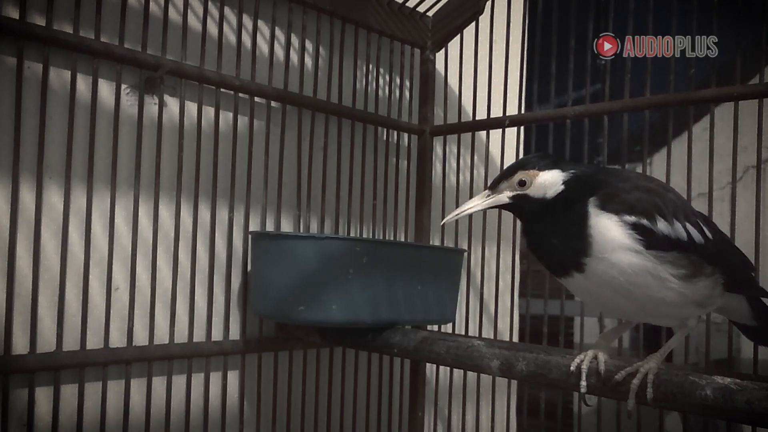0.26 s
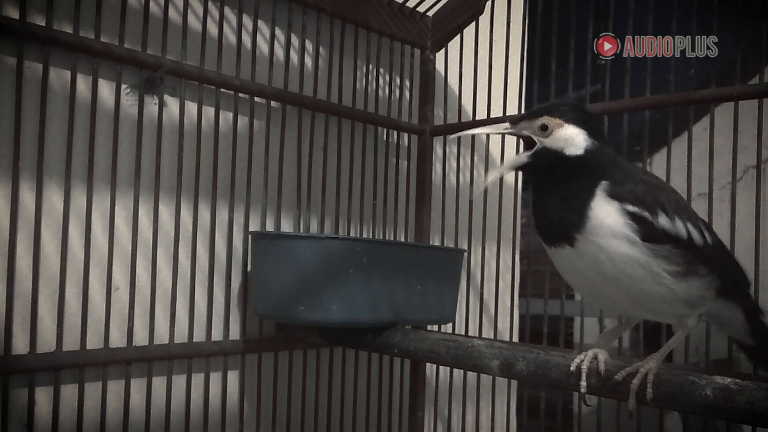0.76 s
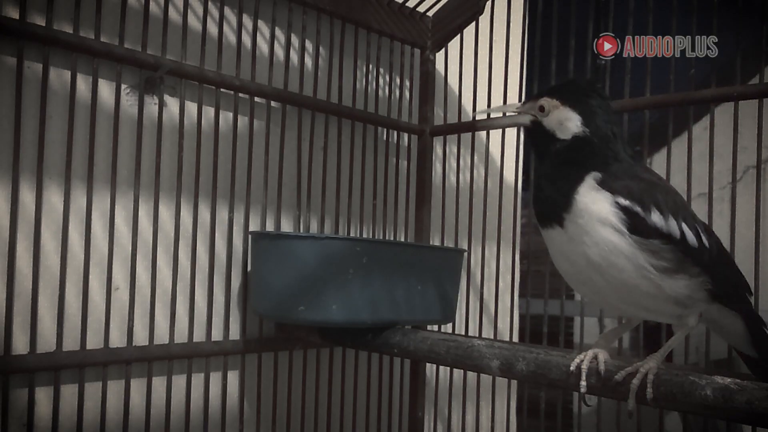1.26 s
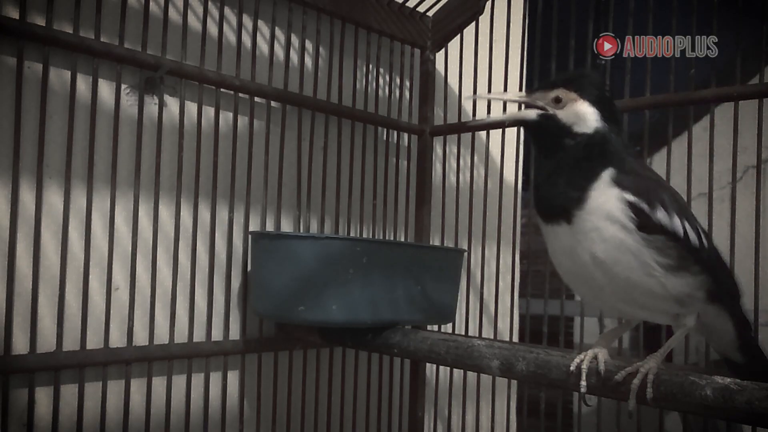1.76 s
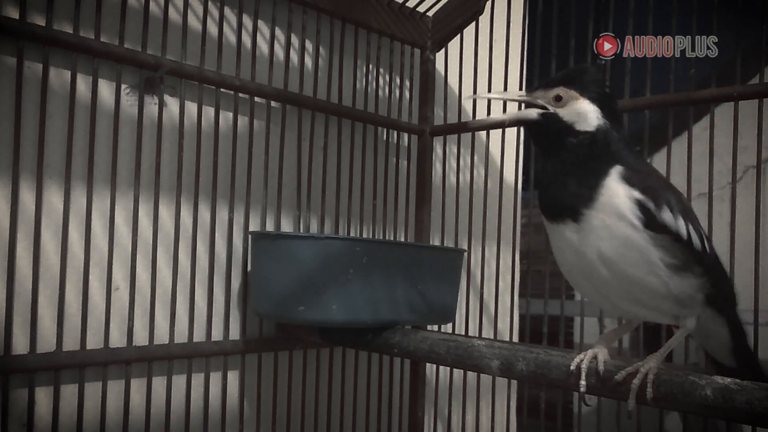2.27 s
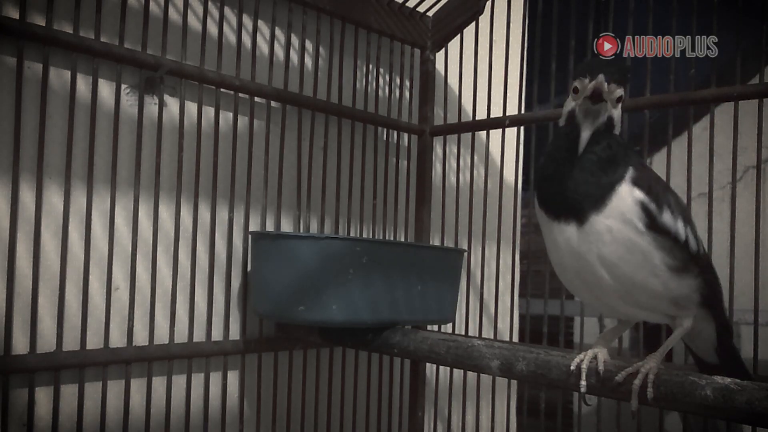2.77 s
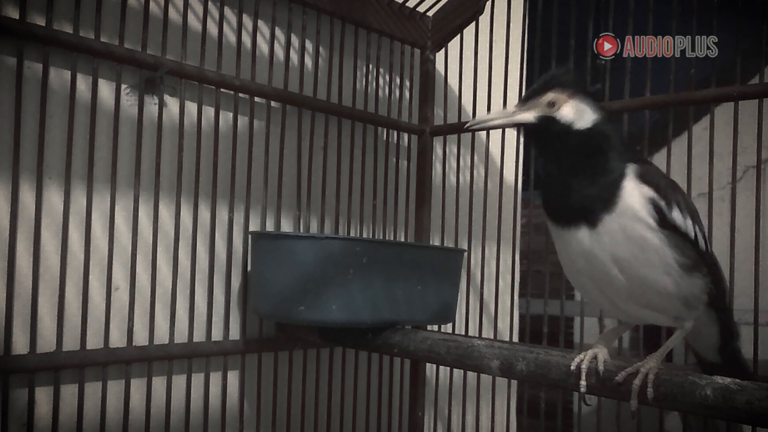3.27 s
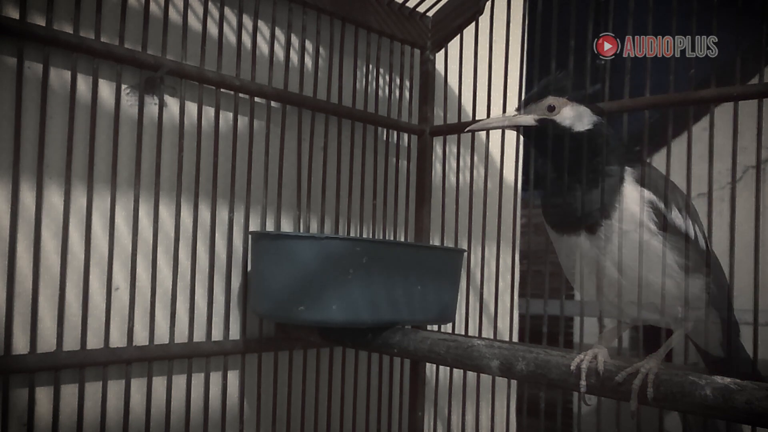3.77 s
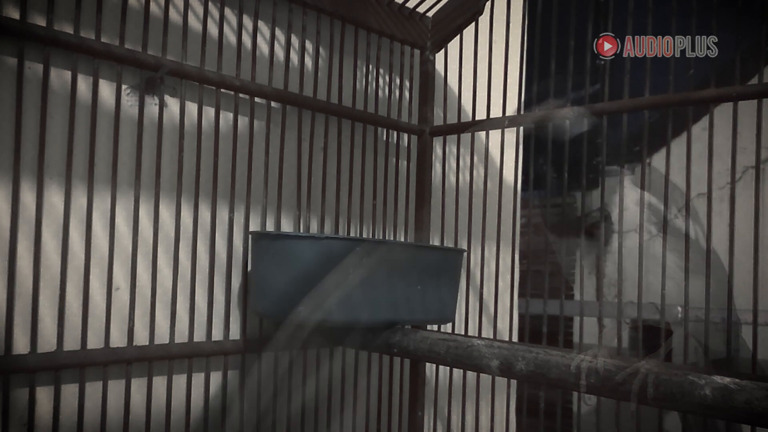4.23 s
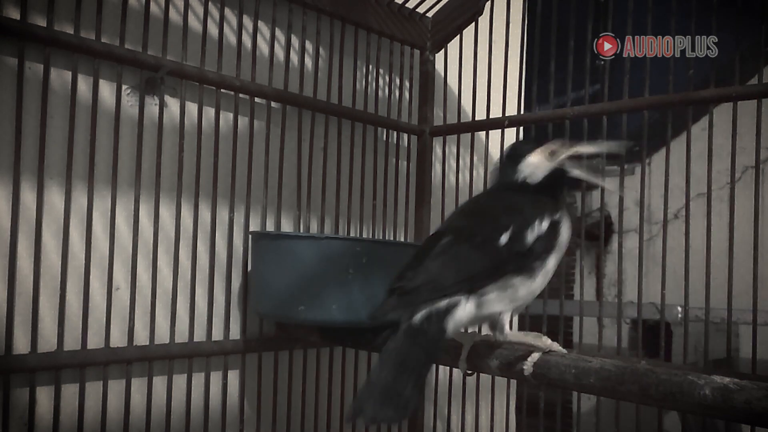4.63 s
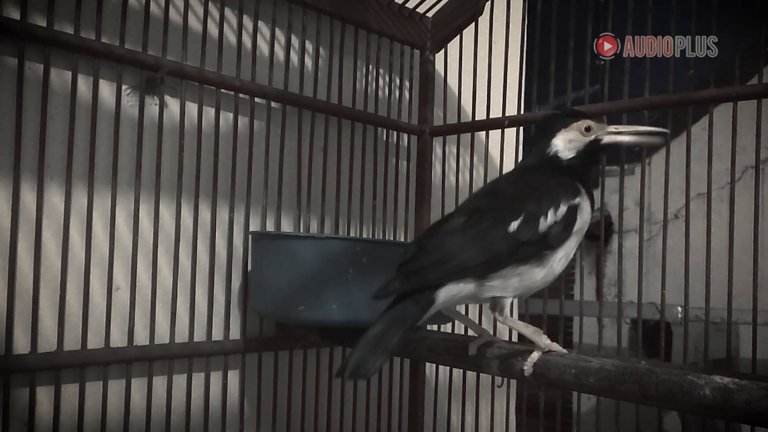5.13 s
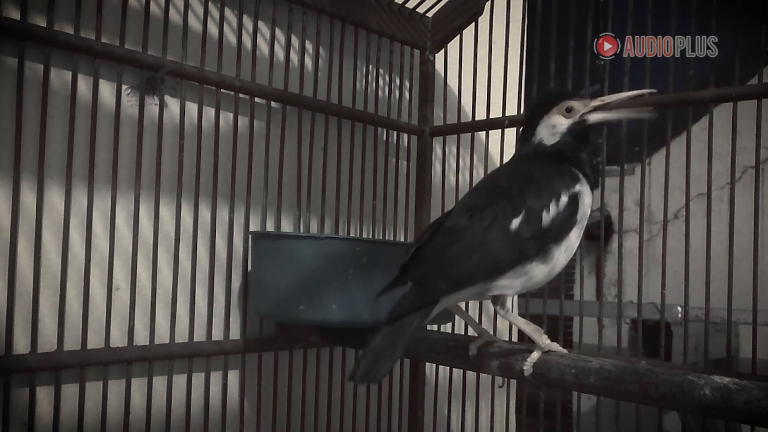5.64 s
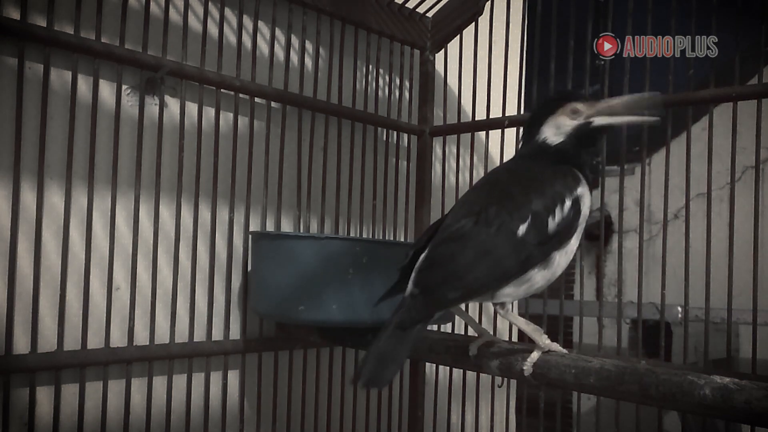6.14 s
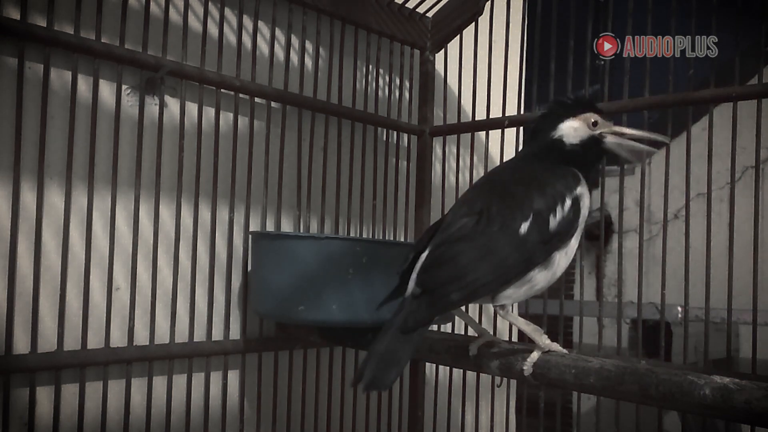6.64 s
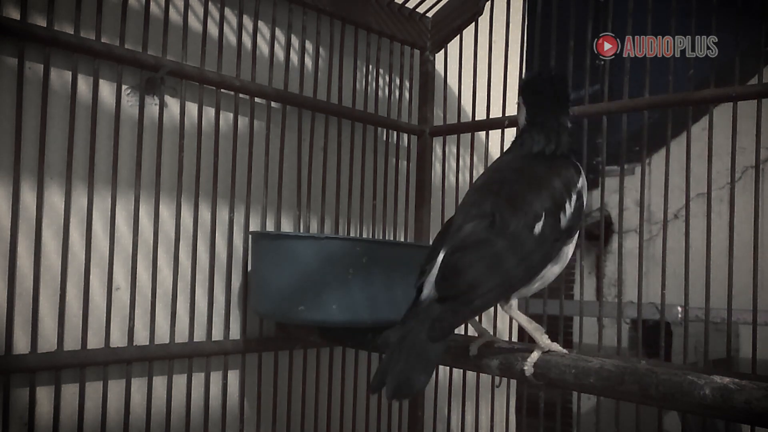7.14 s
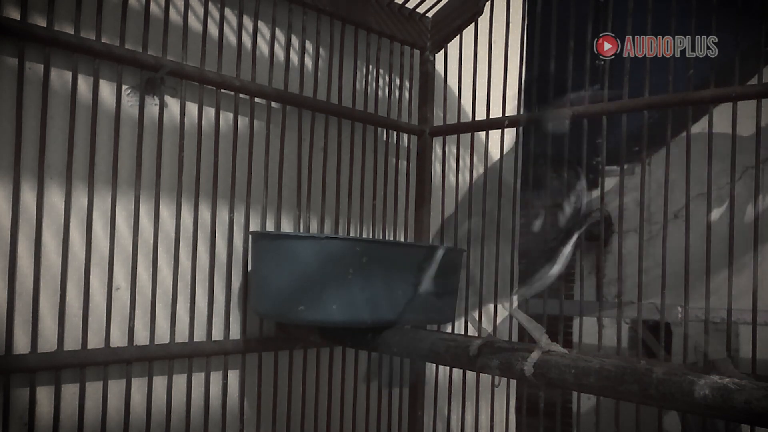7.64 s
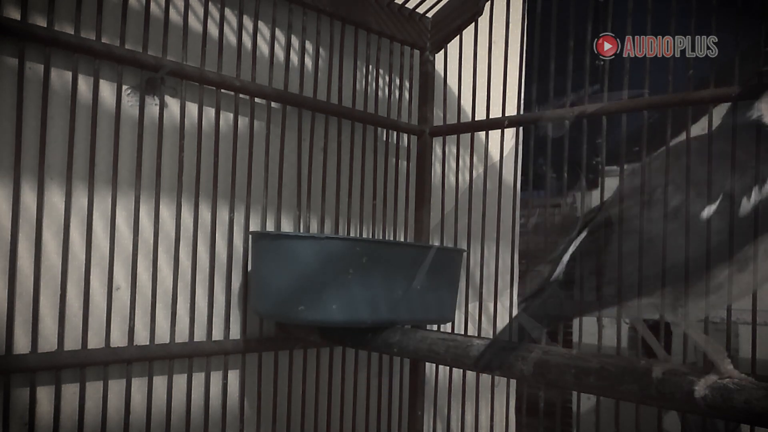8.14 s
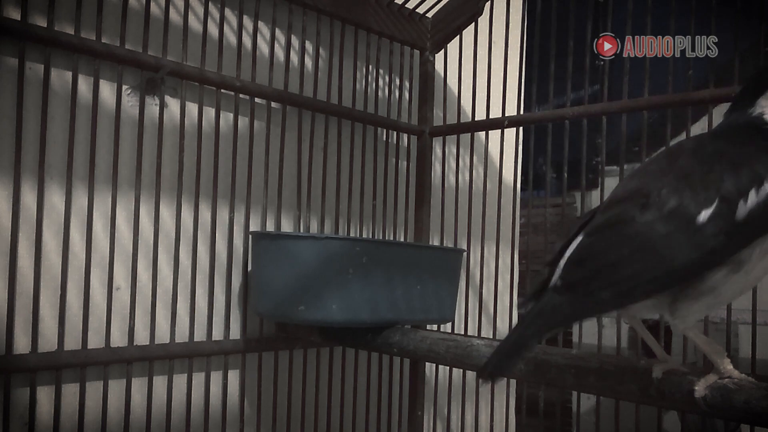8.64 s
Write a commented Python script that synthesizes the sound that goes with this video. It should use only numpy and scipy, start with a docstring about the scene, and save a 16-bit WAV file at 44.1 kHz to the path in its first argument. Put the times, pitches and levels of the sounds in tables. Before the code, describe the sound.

A single starling sings close by in a hard, echoing room. A tiny peep, sharp falling slide and low warble open each phrase, then rapid rounds of shrill call, short trill and longer trill repeat. Two long phrases are separated by a short break with small dry ticks; a third begins near the end. Traffic hums very faintly behind.

```python
"""A pied starling sings three phrases in a cage that stands in a hard-walled, echoing room.
Each phrase opens with a peep, a falling slide and a low warble, then gives shrill call, short trill, long trill:
four rounds, four rounds with a closing call and whistle, then one round.
Notes are gliding harmonic tones with a set tone colour; all but the peeps have quick upward flicks of pitch.
Traffic hums far away; the dying echo of an earlier whistle, low hollow tones and small dry ticks are heard too."""
import sys
import numpy as np
from scipy import signal
from scipy.fft import rfft, irfft, next_fast_len
from scipy.io import wavfile
from scipy.ndimage import uniform_filter1d, minimum_filter1d, map_coordinates

SR = 44100
rng = np.random.default_rng(int(sys.argv[2]) if len(sys.argv) > 2 else 0)


def materialize(psi):
    """Save the field psi as 16-bit PCM at rate SR to the path in sys.argv[1].

    A 1-D psi becomes a single channel; in a 2-D psi each row is a channel.
    """
    bounded = np.clip(np.atleast_2d(psi).T, -1, 1)
    quanta = np.round(bounded * 32767).astype(np.int16)
    wavfile.write(sys.argv[1], SR, quanta)


N = 392490
TOP_HZ = 14650  # band limit


def amp(db):
    """Decibels to amplitude factor."""
    return 10 ** (np.asarray(db) / 20)


def unit(x):
    """x at rms 1."""
    return x / np.sqrt(np.mean(x ** 2) + 1e-20)


def along(points, hz):
    """(Hz, value) points read on a log frequency axis."""
    point_hz, value = np.transpose(points)
    return np.interp(np.log(hz + 1), np.log(point_hz + 1), value)


def at_time(points, s):
    """(s, value) points read on a linear time axis."""
    return np.interp(s, *np.transpose(points))


def wobble(knots_per_s, size):
    """A smooth random curve through normally distributed knots."""
    knots = rng.standard_normal(size // 8 + 4)
    return map_coordinates(knots, [np.arange(size) * knots_per_s / SR], mode="mirror")


def filtered(x, response):
    """x times a response of frequency."""
    size = x.shape[-1]
    padded = next_fast_len(size + SR // 8)
    spectrum = rfft(x, padded) * response(np.fft.rfftfreq(padded, 1 / SR))
    return irfft(spectrum, padded)[..., :size]


def add(track, s, sound):
    """Mix a stereo sound into the track at time s."""
    part = track[:, round(s * SR):][:, :sound.shape[1]]
    part += sound[:, :part.shape[1]]


def ramp(t, span_s):
    """From 0 to 1 within span_s."""
    return np.clip(t / span_s, 0, 1)


def arch(t, attack_s, release_s):
    """Attack, hold at 1, release to 0 at the end of t."""
    return np.minimum(ramp(t, attack_s), ramp(t[-1] - t, release_s))


# Traffic spectrum: (frequency [Hz], relative density [dB])
TRAFFIC_SPECTRUM = [(25, -34), (50, -23.5), (90, -12.5), (160, -1.5), (280, -11.5), (500, -6), (720, -9),
                    (1100, -24.5), (2400, -28.5), (5000, -54)]
# Traffic loudness: (time [s], level [dB])
TRAFFIC_LEVEL = [(0, -64.5), (.8, -52.5), (3.8, -57), (5.5, -52.5), (7.401, -58), (8.9, -51.5)]


def traffic(side_db=-6, hiss_db=-86):
    """Low street hum, nearly mono: shaped noise with a weaker side signal, over a faint white hiss."""
    hum = filtered(rng.standard_normal((2, N)), lambda hz: amp(along(TRAFFIC_SPECTRUM, hz)))
    mid, side = hum * amp([[0], [side_db]])
    stereo = unit(np.array([mid + side, mid - side]))
    level_db = at_time(TRAFFIC_LEVEL, np.arange(N) / SR)
    return amp(level_db) * stereo + amp(hiss_db) * rng.standard_normal((2, N))


# Room decay: (frequency [Hz], time to fall 60 dB [s])
ROOM_T60 = [(1000, 0.65), (2700, .78), (5000, 0.87), (8000, 0.61), (14000, 0.54)]
# Treble is beamed forward and feeds the room less: (frequency [Hz], gain [dB])
ROOM_COLOUR = [(1300, -1), (3500, -2), (7000, -1.5), (14000, -3.5)]
# Perch position: (time [s], lead of the left port [ms])
PERCH_LEAD = [(0, .05), (4, .06), (4.5, .09), (7.4, .09), (7.8, .2)]


def paths(s, direct_db, cage_db=-7, cage_life_s=0.0023, wall_db=-7, wall_life_s=0.042,
          room_db=-3.5, gap_s=0.0049):
    """Impulse responses to both ports: direct sound, cage scatter, sparse near-wall echoes, diffuse tail."""
    size = SR * 3 // 4
    t = np.arange(size) / SR
    # each band of the tail decays at its own rate
    hz, frame_s, noise = signal.stft(rng.standard_normal((2, size)), SR, nperseg=256)
    decay = amp(-60 * frame_s / along(ROOM_T60, hz)[:, None])
    tail = signal.istft(noise * decay, SR, nperseg=256)[1][:, :size] * (t > gap_s)
    cage = rng.standard_normal((2, size)) ** 3 * t * np.exp(-2 * t / cage_life_s)
    # the fifth power makes the noise sparse
    walls = rng.standard_normal((2, size)) ** 5 * (t > gap_s) * np.exp(-t / wall_life_s)
    room = amp(wall_db) * unit(walls) + amp(room_db) * unit(tail)
    room = filtered(room, lambda hz: amp(along(ROOM_COLOUR, hz)))
    echoes = (amp(cage_db) * unit(cage) + room) / np.sqrt(size)
    lead = round(at_time(PERCH_LEAD, s) * SR / 1000)
    direct = np.array([t == 0, np.arange(size) == lead])
    return echoes + amp(direct_db) * direct


# Faint tones: first the dying echo of a whistle sung just before, then low hollow tones from far off:
# (time [s], length [s], first pitch [Hz], last pitch [Hz], level before the room [dB])
FAINT_TONES = [(0, .14, 2673, 2447, -61), (0.604, 0.16, 590, 607.5, -49.5), (1.417, 0.48, 590, 508, -55),
               (3.56, 0.52, 700, 596, -58)]


def faint_tones(waver_hz=24):
    """Soft wavering sine glides, arriving mostly as echo."""
    track = np.zeros((2, N))
    for s, length_s, first_hz, last_hz, level_db in FAINT_TONES:
        size = round(length_s * SR)
        pitch_hz = np.linspace(first_hz, last_hz, size) + waver_hz * wobble(58, SR)[:size]
        tone = np.sin(2 * np.pi * np.cumsum(pitch_hz) / SR) * signal.windows.tukey(size)
        heard = signal.fftconvolve(tone[None], paths(s, direct_db=-4), axes=1)
        add(track, s, amp(level_db) * heard)
    return track


def flick_train(first_s, gap_s, top_hz, count, quicken=1, tire_hz=0):
    """(s, top Hz) of each flick: each gap is quicken times the last; tops sag by up to tire_hz."""
    k = np.arange(count)
    gaps_s = gap_s * quicken ** k
    times_s = first_s + np.cumsum(gaps_s) - gaps_s
    return list(zip(times_s, top_hz - tire_hz * (k / max(count - 1, 1)) ** 2))


def syrinx(length_s, gesture, flicks, colour, overtone_db, rise_s, fall_s, accent_db, bright_db, jitter,
           rasp_db, lag_s, attack_s=0.003, release_s=0.003, uneven_db=1.5, uneven_top=0.04053, detune=0.0073):
    """One note: a harmonic tone follows the gesture, flicks upward and sweeps through its tone colour."""
    size = round(length_s * SR) + 1
    t = np.arange(size) / SR
    pitch_hz, level_db = gesture(t)
    push = np.zeros(size)

    def snap(s):
        """Muscles snap tight and relax again."""
        return 1 / np.cosh(np.clip((t - s) / np.where(t < s, rise_s, fall_s), -20, 20))

    for s, top_hz in flicks:
        flick_hz = top_hz * (1 + uneven_top * rng.standard_normal())
        pitch_hz = pitch_hz + (flick_hz - pitch_hz) * snap(s)
        # air flow changes with each flick, lag_s behind the pitch
        air = snap(s + lag_s)
        push += air
        level_db = level_db + (accent_db + uneven_db * rng.standard_normal()) * air
    pitch_hz = pitch_hz * (1 + detune * rng.standard_normal() + jitter * wobble(700, SR // 2)[:size])
    phase = 2 * np.pi * np.cumsum(pitch_hz) / SR
    buzz_db = overtone_db + bright_db * push  # harder pushes brighten the tone
    k = np.arange(1, 13)[:, None]  # harmonic number
    partial_hz = k * pitch_hz
    gains = amp(along(colour, partial_hz) + buzz_db * (k > 1)) * (partial_hz < SR / 2)
    tone = np.sum(gains * np.sin(k * phase), axis=0)
    # membrane rasp between the harmonics
    floor_hz = np.median(pitch_hz)
    rasp = filtered(rng.standard_normal(SR // 2),
                    lambda hz: amp(along(colour, hz)) * (hz > floor_hz) * (hz < TOP_HZ))
    voice = tone + amp(rasp_db + buzz_db) * unit(rasp)[:size]
    return arch(t, attack_s, release_s) * amp(level_db) * voice


def burst(size, life_s, corner_hz):
    """Click that opens a note: decaying high-passed noise."""
    hiss = filtered(rng.standard_normal(SR // 2),
                    lambda hz: hz ** 2 / (hz ** 2 + corner_hz ** 2) * (hz < TOP_HZ))
    return unit(hiss)[:size] * np.exp(-np.arange(size) / SR / life_s)


def bars(x, reflect=0.98, reach_s=0.0027, corner_hz=4500, count=4):
    """Thin cage bars beside the bill reflect mainly treble and comb it into ridges."""
    delays_s = reach_s * rng.uniform(.25, 1, (count, 1))

    def comb(hz):
        """Direct sound plus delayed reflections."""
        share = reflect * hz ** 2 / (hz ** 2 + corner_hz ** 2)
        echoes = np.exp(-2j * np.pi * hz * delays_s).sum(axis=0)
        return (1 + share * echoes) / np.sqrt(1 + count * share ** 2)

    return filtered(x, comb)


# How squarely the bill points at the microphone: (time [s], added to the direct sound [dB])
FACING = [(.5, -3), (3, -1), (4.4, -5.5), (5.5, -3.5), (6.8, -5.5), (8.6, -3)]


def notes(table, gesture, colour, flicks=(), direct_db=0, rise_s=0.0025, fall_s=0.0039, accent_db=0,
          bright_db=0, jitter=0.0057, rasp_db=-32, lag_s=0.00058, pop_db=-60, pop_life_s=0.001, pop_hz=2500):
    """All notes of one kind; the head moves between them, so each meets new echoes."""
    track = np.zeros((2, N))
    for s, length_s, level_db, overtone_db, *fade in table:
        note = syrinx(length_s, lambda t: gesture(t, *fade), flicks, colour, overtone_db, rise_s, fall_s,
                      accent_db, bright_db, jitter, rasp_db, lag_s)
        size = len(note)
        note = bars(unit(note) + amp(pop_db) * burst(size, pop_life_s, pop_hz))
        room = paths(s, direct_db + at_time(FACING, s))
        heard = signal.fftconvolve(note[None], room, axes=1)
        add(track, s, amp(level_db) * heard / np.std(heard[:, :size]))
    return track


def peep(t, top_hz=2320, scoop_hz=500, scoop_s=0.0055, attack_s=0.0064, release_s=0.004, swell_db=18):
    """Scoops up to its pitch. Like every gesture it gives (pitch Hz, effort dB)."""
    return top_hz - scoop_hz * np.exp(-t / scoop_s), swell_db * arch(t, attack_s, release_s)


# Tone colour of peeps and slides: (frequency [Hz], gain [dB])
SLIDE_COLOUR = [(2000, -4.5), (3000, 2.5), (3900, -6), (4600, -9.5), (5300, -10), (7000, -4), (9000, -4.5),
                (12000, -12.5), (14500, -35.5)]
# (time [s], length [s], level [dB], overtones [dB])
PEEPS = [(.386, 0.024, -17, 7.5), (4.2, 0.0097, -31, -4), (7.887, 0.022, -24.5, 1)]


def peeps():
    """Tiny opening notes, with no flicks."""
    return notes(PEEPS, peep, SLIDE_COLOUR, direct_db=-2, rasp_db=-29.5)


def slide(t, start_hz=4000, overshoot_hz=950, settle_s=.005, fall_hz_per_s=35000, bottom_hz=2400,
          fade_db_per_s=340):
    """Starts overtight, then falls steadily to a floor and fades."""
    pitch_hz = start_hz + overshoot_hz * np.exp(-t / settle_s) - fall_hz_per_s * t
    return np.maximum(pitch_hz, bottom_hz), -fade_db_per_s * t


# (time [s], length [s], level [dB], overtones [dB])
SLIDES = [(.409, .058, -9, -3.5), (4.222, .06, -12, -7.5), (7.911, 0.06, -10, -8)]


def slides():
    """Falling notes that burst open with a click and flick once near the end."""
    flicks = flick_train(first_s=.051, gap_s=0, top_hz=2803, count=1)
    return notes(SLIDES, slide, SLIDE_COLOUR, flicks, direct_db=1.5, rise_s=.0025, fall_s=.012,
                 accent_db=12, jitter=0.01, rasp_db=-21.5, pop_db=-5.5)


def hook(t, pitch_hz, effort_db, hook_db, hook_s=.02, hook_hz=1090, break_s=0.0041, break_db=10):
    """Ends a gesture: the voice breaks for an instant and goes to a last low tone."""
    since_s = t - (t[-1] - hook_s)
    late = ramp(since_s, break_s)
    dip_db = break_db * np.exp(-(since_s / break_s) ** 2)
    return pitch_hz + (hook_hz - pitch_hz) * late, effort_db + (hook_db - effort_db) * late - dip_db


def warble(t, low_hz=1020, lift_hz=600, roundness=0.61, swell_db=12, span=1.06):
    """One round arch of effort, a little longer than the note, lifts pitch and level together."""
    effort = np.abs(np.sin(np.pi * t / (span * t[-1]))) ** roundness
    return hook(t, low_hz + lift_hz * effort, swell_db * effort, hook_db=5.5)


# Tone colour of warbles: (frequency [Hz], gain [dB])
WARBLE_COLOUR = [(1000, -13), (1400, -2), (1700, -1), (2300, -7), (3000, -9.5), (4500, -26), (7000, -33),
                 (11000, -29), (14500, -30.5)]
# (time [s], length [s], level [dB], overtones [dB])
WARBLES = [(.534, .168, -15.5, -7.5), (4.344, .172, -20, -5), (8.038, .178, -18, -3)]


def warbles():
    """Low notes with four even flicks that brighten the tone."""
    flicks = flick_train(first_s=.02, gap_s=.032, top_hz=2448, count=4)
    return notes(WARBLES, warble, WARBLE_COLOUR, flicks, direct_db=5.0, rise_s=.0022, fall_s=.0028,
                 accent_db=-1, bright_db=9, jitter=0.011, lag_s=0, rasp_db=-30.0)


def shrill(t, fade_db_per_s, hold_hz=3300, overshoot_hz=220, settle_s=.005, step_hz=260, step_at_s=.026,
           step_s=.011):
    """Held pitch that steps up a little at its second flick, and fades or swells."""
    settling_hz = overshoot_hz * np.exp(-t / settle_s)
    return hold_hz + settling_hz + step_hz * ramp(t - step_at_s, step_s), -fade_db_per_s * t


# Tone colour of shrill calls: (frequency [Hz], gain [dB])
CALL_COLOUR = [(3000, -1), (3500, 4.5), (4400, -4.5), (5500, -4), (6200, -19), (7100, -5), (8600, -11),
               (10000, -2.5), (11200, -7), (12300, -22), (13600, -15.5), (15000, -14.5)]
# (time [s], length [s], level [dB], overtones [dB], fade [dB/s, negative swells])
SHRILLS = [(.765, .066, -6, -6.5, 120), (1.365, .073, -6, -4.5, 128), (1.963, .074, -6.5, -6, 120),
           (2.591, 0.067, -5, -4, 9.5), (4.589, 0.08, -9.5, -9, 30), (5.219, .08, -9.5, -5.5, -28),
           (5.828, .068, -8, -6, 40), (6.446, 0.082, -10, -5, -20), (7.089, .1, -9.5, -7.5, 40),
           (8.276, 0.06, -6.5, -5.5, 60)]


def shrills():
    """Loud calls that burst open with a click; their flicks quicken and tire."""
    flicks = flick_train(first_s=.0005, gap_s=.0315, top_hz=5646, count=6, quicken=.78, tire_hz=920)
    return notes(SHRILLS, shrill, CALL_COLOUR, flicks, direct_db=1.5, rise_s=.0017, fall_s=.0018,
                 accent_db=1, bright_db=8, jitter=0.0032, rasp_db=-30, pop_db=-5.5)


def short_trill(t, low_hz=1000, lift_hz=290, attack_s=.018, swell_db=13, grow_db_per_s=50, leap_at_s=.08,
                leap_s=.01, leap_hz=560, climb_hz_per_s=12000, release_s=.012):
    """Scoops up to a low pitch, grows, and leaps into a rising whistle near its last flick."""
    after_s = np.maximum(t - leap_at_s, 0)
    pitch_hz = low_hz + lift_hz * ramp(t, attack_s)
    pitch_hz = pitch_hz + leap_hz * ramp(after_s, leap_s) + climb_hz_per_s * after_s
    return pitch_hz, swell_db * arch(t, attack_s, release_s) + grow_db_per_s * t


# Tone colour of trills and the whistle: (frequency [Hz], gain [dB])
LOW_COLOUR = [(1000, -8), (1350, -8), (1700, -1.5), (2150, 6.5), (2900, -0.5), (3800, -10), (4900, -17.5),
              (5700, -18), (8000, -16), (11000, -17.5), (14500, -25.5)]
# (time [s], length [s], level [dB], overtones [dB])
SHORT_TRILLS = [(.912, 0.12, -15, -3.5), (1.521, .11, -13, 4), (2.127, 0.13, -14.5, 3),
                (2.769, .11, -13, 1), (4.743, 0.1, -16, -3.5), (5.379, 0.11, -13.5, -2.5),
                (5.990, 0.115, -14.5, -0.5), (6.622, 0.11, -16.5, -4), (8.428, 0.11, -15, -2)]


def short_trills():
    """Low notes with three flicks, each accented a little after the pitch."""
    flicks = flick_train(first_s=.02, gap_s=.0337, top_hz=2817, count=3)
    return notes(SHORT_TRILLS, short_trill, LOW_COLOUR, flicks, direct_db=-0.5, rise_s=.0018, fall_s=0.0033,
                 accent_db=7.0, jitter=.008, rasp_db=-50.5, lag_s=0.005)


def long_trill(t, low_hz=1010, lift_hz=250, bow_hz=100, attack_s=.018, sag_s=.042, onset_db=13, swell_db=6.0):
    """Scoops up to a low pitch, swells and lifts towards the middle, and sags at the end."""
    bow = np.sin(np.pi * t / t[-1])
    pitch_hz = low_hz + lift_hz * arch(t, attack_s, sag_s) + bow_hz * bow
    return hook(t, pitch_hz, onset_db * ramp(t, attack_s) + swell_db * bow, hook_db=12.5)


# (time [s], length [s], level [dB], overtones [dB])
LONG_TRILLS = [(1.091, 0.2, -14, -2.5), (1.699, .2, -15, 0), (2.316, 0.2, -14.5, -1),
               (2.963, .2, -15, -3.5), (4.933, 0.22, -16, -3.5), (5.561, 0.19, -15, -2),
               (6.183, .186, -18, -4.5), (6.820, .19, -18, -6.5), (8.616, .2, -13.5, -2.5)]


def long_trills():
    """Low notes with five slightly quickening, tiring flicks."""
    flicks = flick_train(first_s=.0205, gap_s=.0355, top_hz=2951, count=5, quicken=0.96, tire_hz=118)
    return notes(LONG_TRILLS, long_trill, LOW_COLOUR, flicks, direct_db=2, rise_s=.0018, fall_s=.0033,
                 accent_db=5.5, bright_db=4.5, jitter=.009, rasp_db=-40.5, lag_s=.0035)


# Tick spectrum: (frequency [Hz], gain [dB])
TICK_COLOUR = [(2000, -16), (5000, -19), (9000, -1), (15000, -5.5)]
# Small dry ticks as the bird shifts: (time [s], relative level [dB])
TICKS = [(3.8435, -29), (3.9146, -18), (3.931, -15.5)]


def ticks(life_s=0.00084, gain_db=-14):
    """Bright, fast-decaying noise bursts that wake the room."""
    track = np.zeros((2, N))
    t = np.arange(SR // 16) / SR
    for s, level_db in TICKS:
        noise = filtered(rng.standard_normal(len(t)), lambda hz: amp(along(TICK_COLOUR, hz)))
        tick = unit(noise) * np.exp(-t / life_s)
        heard = signal.fftconvolve(tick[None], paths(s, direct_db=-13.5), axes=1)
        add(track, s, amp(level_db + gain_db) * heard)
    return track


def whistle(t, hold_hz=2590, attack_s=0.0021, swell_db=12, fade_db_per_s=100):
    """A level pitch that fades."""
    return np.full(len(t), hold_hz), swell_db * ramp(t, attack_s) - fade_db_per_s * t


# (time [s], length [s], level [dB], overtones [dB])
WHISTLES = [(7.202, .055, -14.5, -1.5)]


def whistles():
    """A steady note with one flick near its start."""
    flicks = flick_train(first_s=0.0065, gap_s=0, top_hz=2892, count=1)
    return notes(WHISTLES, whistle, LOW_COLOUR, flicks, direct_db=1, jitter=0.0015, rasp_db=-45)


def starling():
    """The song: every kind of note summed."""
    return peeps() + slides() + warbles() + shrills() + short_trills() + long_trills() + whistles()


# Stereo balance of the bird: (frequency [Hz], left minus right [dB])
LEFT_BIAS = [(1300, 2.5), (2500, -.5), (5000, 0), (9000, 4.5), (13000, 7)]


def scene():
    """The bird's treble reaches the left port more strongly; traffic and faint tones are added unbiased."""
    bird = filtered(starling() + ticks(), lambda hz: amp(np.outer([.5, -.5], along(LEFT_BIAS, hz))))
    return bird + traffic() + faint_tones()


def record(dry, top=0.89, hold_s=0.00039):
    """A fast limiter turns down the highest peaks; a steep low-pass cuts above the band limit."""
    size = max(round(hold_s * SR), 1)
    needed = top / np.maximum(np.abs(dry).max(axis=0), top)
    held = dry * uniform_filter1d(minimum_filter1d(needed, size), size)
    # 1 dB per 12 Hz, down to -120 dB
    return filtered(held, lambda hz: amp(-np.clip((hz - TOP_HZ) / 12, 0, 120)))


dry = scene()
out = record(dry)
materialize(out)
```